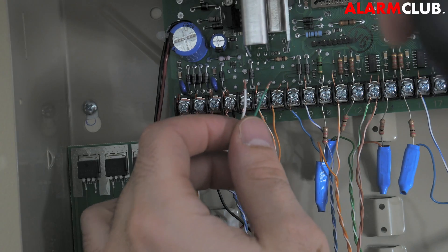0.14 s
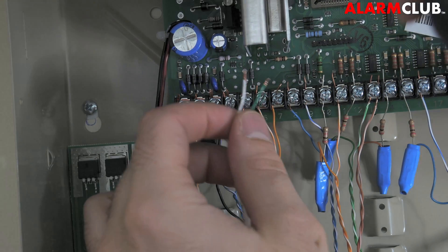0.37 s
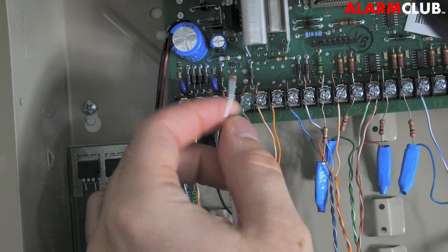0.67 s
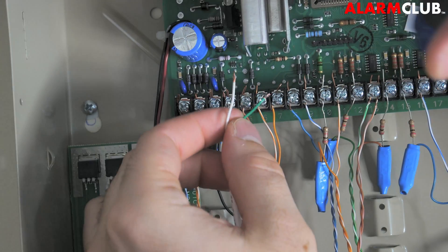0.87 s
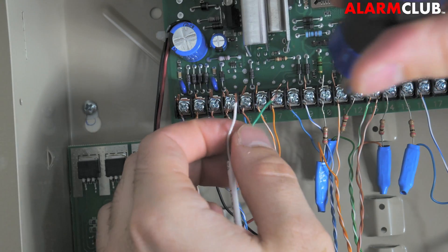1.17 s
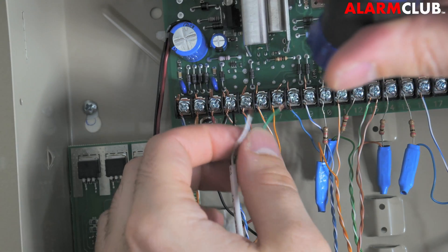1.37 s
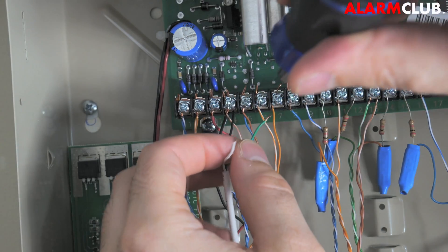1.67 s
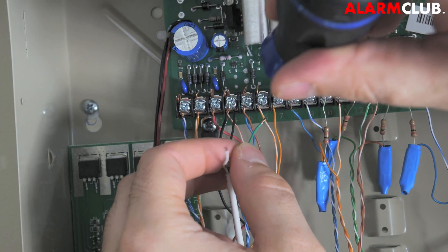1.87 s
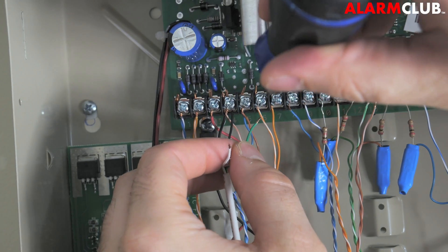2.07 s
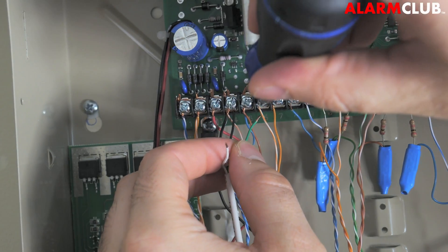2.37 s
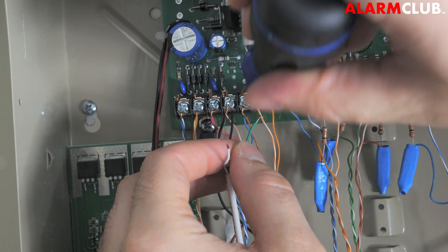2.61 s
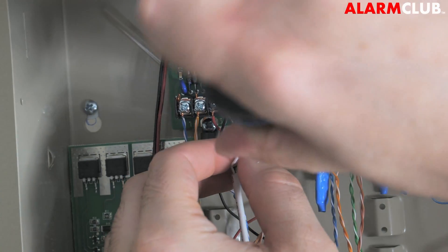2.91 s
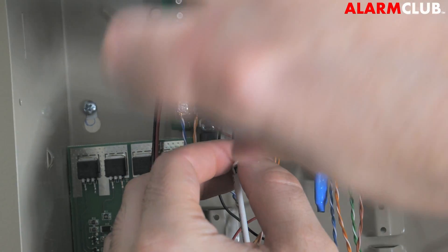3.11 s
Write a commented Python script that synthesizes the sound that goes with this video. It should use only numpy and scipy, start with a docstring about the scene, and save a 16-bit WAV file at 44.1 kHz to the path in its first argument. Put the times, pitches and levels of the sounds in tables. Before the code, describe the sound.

A screwdriver knocks against a terminal block in a sheet-metal cabinet, close and to the left. First, a handled wire ticks faintly from about 0.4 seconds, with a clearer tick at 1.7 and a tiny scrape. Hollow, briefly ringing knocks start at 2.3 and build to one sharp clack at 2.9, followed by a soft bump and faint rub. A fan hums softly throughout in the quiet room.

```python
"""A wire ticks and scrapes faintly in a quiet room, over the soft hum of a fan.
Fingers are bending it at a screw terminal block inside a sheet-metal cabinet.
Then a hand with a screwdriver knocks against the block, building to one sharp clack.
Each tick rings the wire and each knock rings the cabinet: a few clear tones plus fading noise."""
import sys
import numpy as np
from scipy import signal
from scipy.fft import rfft, irfft
from scipy.io import wavfile

SR = 44100
rng = np.random.default_rng(int(sys.argv[2]) if len(sys.argv) > 2 else 0)


def generate_wav(sig):
    """Save sig (samples, or channels by samples) to the path in sys.argv[1] as 16-bit PCM at SR."""
    pcm = np.round(np.clip(np.atleast_2d(sig).T, -1, 1) * 32767).astype(np.int16)
    wavfile.write(sys.argv[1], SR, pcm)


N = 143325
RING_TIME_S = np.arange(SR // 2) / SR  # the clock for one ring

# the tone of the room's air: pitch_hz, relative_db
AIR_TONE = [(12, -21), (20, -0.5), (70, 0), (306, -11), (342, -10), (404, -13), (452, -8.5), (505, -15),
            (788, -14), (958, -19.5), (1230, -18.5), (1450, -22), (15500, -33.5)]
# how alike the air is in both ears: pitch_hz, likeness_0_to_1
AIR_LIKENESS = [(30, 0.15), (100, 0.033), (400, 0.1), (1500, 0.067), (8000, 0.017)]
# the fan's hum: pitch_hz, level_db, width_hz
FAN_TONES = [(472, -78.5, 16), (800.7, -70.5, 25), (1210, -78.5, 54), (1546, -89, 22), (357, -77.5, 30)]
# how long the room echoes: pitch_hz, fade_s (every fade_s is the time to fall by 60 dB)
ROOM_FADES = [(100, .55), (500, 0.19), (2000, 0.28), (10000, 0.17)]
# wire or skin sliding: start_s, length_s, level_db, slips_per_s, brightness_0_to_1
SLIDE_EVENTS = [(1.825, 0.017, -48, 2500, 1), (3.098, .17, -62, 1500, 0.36)]
# the tone of wire scraping a screw: pitch_hz, relative_db
SCRAPE_TONE = [(200, -12), (1000, -5), (2200, 4.5), (4000, 5), (5500, -0.5), (10000, 2), (13500, -3),
               (16000, -30)]
# the tone of skin rubbing: pitch_hz, relative_db
RUB_TONE = [(200, -16), (1800, -7), (2700, 13), (3500, 0), (4600, -20), (7500, -15), (15000, -19)]
# the wire's ticks: start_s, level_db, pitch_hz, boost_at_pitch_db, snap_db
TICK_EVENTS = [(0.383, -28.5, 2480, -1, -5), (0.393, -31, 1370, 11, -15), (0.4514, -27, 3250, 3.5, 4),
               (0.475, -34, 2600, -2, -13), (.497, -36.5, 2240, 1, 0), (.703, -36, 2140, 9, -6),
               (1.002, -25.5, 1500, 15, -2), (1.0686, -24.5, 1690, 0, -7), (1.076, -24, 2300, 2, -10),
               (1.099, -46, 1500, 3, 2), (1.609, -32, 2380, 13, -12), (1.6811, -13.5, 3760, 12, -11.5),
               (1.748, -27.5, 2150, 18, -4), (1.786, -28.5, 3140, 1, 2), (2.551, -39, 2410, 15, 0),
               (2.828, -28, 1650, 10, -23)]
# the clear tones of the wire and its clamp: pitch_hz, relative_db, fade_s
WIRE_TONES = [(1534, -9.5, 0.094), (1860, -21, 0.072), (1984, -7, 0.052), (2540, -9, 0.1),
              (2426, -17, 0.23), (2940, -20, 0.17), (3270, -4.5, 0.028), (3960, -8.5, 0.041)]
# the wire's noisy ring: pitch_hz, relative_db
WIRE_NOISE = [(100, -12), (900, 5), (1500, 9.5), (3800, 0), (4700, -10.5), (6500, -0.5), (8000, -4.5),
              (15000, -9.5)]
# how long that noise lasts: pitch_hz, fade_s
WIRE_FADES = [(500, 0.053), (3000, 0.068), (12000, 0.059)]
# knocks on the block: start_s, level_db, thump_db, hollow_db, bite_db, snap_db
KNOCK_EVENTS = [(2.3336, -1.5, -6.5, 14, 1, -12.5), (2.4026, -0.5, 1, 5, -2, -16),
                (2.4726, -14.5, 9, -2, 5, -11), (2.6185, -4, 7, -2.5, -2, -21),
                (2.7071, -13, 4.5, 5.5, 8.5, -0.5), (2.73, -18, 13.5, -5, 2.5, -6),
                (2.748, -18, 6.5, 3, 5.5, 6.5), (2.8925, 4.5, 2, 5.5, -5.5, -11),
                (2.8977, 5.5, 2.5, -2.5, 3, -5), (2.9, 10, -3.5, -1, 0.5, 5), (2.9062, -3.5, -1, -10, 3, 9),
                (2.9967, -19, 16, 1, 0.5, 5.5)]
# the sheet metal's clear tones: pitch_hz, relative_db, fade_s
CABINET_TONES = [(90, -19.5, 0.18), (119.4, -8.5, 0.15), (160, -21.5, .28), (226.2, -15.5, 0.35),
                 (370.4, -14.5, 0.11), (450.8, -17, 0.17), (492.7, -16, 0.15), (856, -22, 0.078),
                 (1289, -7, 0.092), (1447, -11, 0.06), (1560, -19.5, 0.027), (1750, -17.5, 0.067),
                 (2153, -16.5, 0.05), (2311, -15.5, 0.12), (2762, -15.5, 0.069), (3450, -20.5, 0.11)]
# the noisy ring between those tones: pitch_hz, relative_db
CABINET_NOISE = [(40, -44.5), (100, 6.5), (240, 2), (400, -6), (640, -2), (900, 4.5), (1080, -2),
                 (1300, 1.5), (1750, -2.5), (2700, -2.5), (3500, -8.5), (4200, -15), (5500, -19.5),
                 (6600, -12), (8000, -19.5), (10500, -15), (15500, -24.5)]
# how long that noise lasts: pitch_hz, fade_s
CABINET_FADES = [(100, 0.23), (400, 0.34), (1000, .1), (2500, 0.083), (6000, 0.09), (14000, 0.061)]
# how much louder the left side is at full lean: pitch_hz, left_minus_right_db
LEFT_LOUDER = [(100, 7), (500, 8.5), (1400, 8.5), (3000, 4.5), (6500, 3), (9500, 5), (13000, -3)]
# how far ahead the left wave is at full lean: pitch_hz, lead_radians
LEFT_AHEAD = [(130, 3.2), (500, 2.27), (1300, 2.12), (2400, 0.14), (5000, 1.95), (9000, 2), (14000, 1.5)]

AIR_DB, AIR_LEFT_DB = -56, 0.4
WALL_DELAY_S, WALL_DB, ROOM_DB = 0.019, -12.5, -15  # echoes, compared with the noisy ring
SLIDE_RISE_S, SLIDE_TAIL_S = 0.0048, 0.018
THUMP_HZ, HOLLOW_HZ, BITE_HZ, SNAP_HZ = 1026, 467, 3220, 4640
BUILD_SHARE = 0.0041  # time for a ring to spread through the metal, as a share of fade_s
TONE_SPREAD_DB = 2  # each blow lands in a slightly different place
TREBLE_LIMIT_HZ = 15950


def gain(db):
    """Turns decibels into a multiplier."""
    return 10 ** (np.asarray(db) / 20)


def unit_level(sound):
    """Scales a sound to an average (rms) level of 1."""
    return sound / np.sqrt(np.mean(sound ** 2) + 1e-20)


def look_up(table, hz):
    """Reads between a table's rows, along a musical pitch scale."""
    pitches, values = np.transpose(table)
    return np.interp(np.log(hz + 1), np.log(pitches + 1), values)


def frequencies(sound):
    """The frequency of each slot in a sound's spectrum."""
    return np.fft.rfftfreq(sound.shape[-1], 1 / SR)


def hump(centre_hz, octaves):
    """A bell curve of height 1 around a pitch."""
    return np.exp(-.5 * (np.log2((frequencies(RING_TIME_S) + 1) / centre_hz) / octaves) ** 2)


def add(mix, start_s, sound):
    """Mixes a sound in at its start time."""
    part = mix[:, round(start_s * SR):][:, :sound.shape[1]]
    part += sound[:, :part.shape[1]]


def colour(sound, db):
    """Turns each frequency up or down without smearing the sound ahead of its start."""
    size = sound.shape[-1]
    log_gain = np.log(gain(db))
    mirrored = np.r_[log_gain, log_gain[1:(size + 1) // 2][::-1]]
    response = np.exp(np.conj(signal.hilbert(mirrored)))[:len(db)]
    return irfft(rfft(sound) * response, size)


def blend_sides(noise, likeness):
    """Makes unrelated left and right noise partly alike."""
    left, other = rfft(noise)
    right = likeness * left + np.sqrt(1 - likeness ** 2) * other
    return irfft(np.array([left, right]), noise.shape[-1])


def place_left(sound, lean):
    """Puts a sound to the listener's left, where the cabinet sits."""
    hz = frequencies(sound)
    left = gain(lean * look_up(LEFT_LOUDER, hz) / 2)
    right = np.exp(-1j * lean * look_up(LEFT_AHEAD, hz)) / left
    average = np.sqrt((left ** 2 + left ** -2) / 2)
    return irfft(rfft(sound) * np.array([left, right]) / average, N)


def ring_down(fade_s):
    """A ring builds quickly, then dies away steadily."""
    build = 1 - np.exp(-RING_TIME_S / (BUILD_SHARE * fade_s))
    return build * np.exp(-np.log(1000) * RING_TIME_S / fade_s)


def fading_noise(fades):
    """Crowded reflections blur into noise, each pitch band dying at its own speed."""
    noise = rfft(rng.choice([-1., 1.], (2, len(RING_TIME_S))))
    pitches, fade_times = np.transpose(fades)
    out = 0
    for fade_s, share in zip(fade_times, np.eye(len(fades))):
        band = look_up(np.c_[pitches, share], frequencies(RING_TIME_S))
        fade = ring_down(fade_s)
        out = out + irfft(noise * band) * fade / np.linalg.norm(fade)
    return out


def struck_metal(tones, noise_shape, fades, tones_db, noise_db):
    """One blow: clear tones, plus a noisy ring that echoes off the nearest wall and the room."""
    wall = np.roll(gain(WALL_DB) * fading_noise(fades), round(WALL_DELAY_S * SR), axis=1)
    direct = blend_sides(fading_noise(fades), likeness=0.89)
    room = gain(ROOM_DB) * fading_noise(ROOM_FADES)
    noise = colour(direct + wall + room, look_up(noise_shape, frequencies(RING_TIME_S)))
    clear = 0
    for hz, db, fade_s in tones:
        cycles = hz * rng.uniform(1.0, 1.01) * RING_TIME_S + rng.random()
        tone = np.sin(2 * np.pi * cycles) * ring_down(fade_s)
        clear = clear + gain(db + TONE_SPREAD_DB * rng.standard_normal()) * tone / np.linalg.norm(tone)
    return gain(noise_db) * noise / np.linalg.norm(noise[0]) + gain(tones_db) * clear


def contact_db(thump_db, snap_db):
    """Soft flesh adds low thump to a blow; a hard edge adds high snap."""
    hz = frequencies(RING_TIME_S)
    return thump_db / (1 + (hz / THUMP_HZ) ** 4) + snap_db * (1 - 1 / (1 + (hz / SNAP_HZ) ** 3))


def room_air():
    """The room's air makes a steady low rumble and hiss."""
    hz = frequencies(np.zeros(N))
    noise = blend_sides(rng.standard_normal((2, N)), look_up(AIR_LIKENESS, hz))
    return gain(AIR_DB) * unit_level(colour(noise, look_up(AIR_TONE, hz)))


def fan():
    """A fan hums: each wavering tone is a narrow band of noise."""
    out = np.zeros((2, N))
    for pitch_hz, db, width_hz in FAN_TONES:
        noise = blend_sides(rng.standard_normal((2, N)), likeness=0.49)
        band = 1 / (1 + (2 * (frequencies(out) - pitch_hz) / width_hz) ** 2)
        out += gain(db) * unit_level(irfft(rfft(noise) * band, N))
    return out


def slides():
    """A slide is a crowd of tiny slips: bright for bare wire on a screw, soft for skin."""
    out = np.zeros((2, N))
    hz, size = frequencies(RING_TIME_S), len(RING_TIME_S)
    for start_s, length_s, db, slips_per_s, brightness in SLIDE_EVENTS:
        slips = rng.standard_normal((2, size)) * (rng.random(size) < slips_per_s / SR)
        ringing = irfft(rfft(slips) * rfft(fading_noise(WIRE_FADES)))  # every slip rings the wire
        tone_db = brightness * look_up(SCRAPE_TONE, hz) + (1 - brightness) * look_up(RUB_TONE, hz)
        scrape = colour(blend_sides(ringing, likeness=0.45), tone_db)
        rise = np.minimum(RING_TIME_S / SLIDE_RISE_S, 1)
        fall = np.exp(-np.maximum(RING_TIME_S - length_s, 0) / SLIDE_TAIL_S)
        add(out, start_s, gain(db) * rise * fall * unit_level(scrape))
    return out


def wire_ticks():
    """The wire flicks against the terminals and rings, a little differently each time."""
    out = np.zeros((2, N))
    for start_s, db, pitch_hz, boost_db, snap_db in TICK_EVENTS:
        ring = struck_metal(WIRE_TONES, WIRE_NOISE, WIRE_FADES, tones_db=-1.5, noise_db=4.5)
        tick = colour(ring, boost_db * hump(pitch_hz, octaves=0.35) + contact_db(0, snap_db))
        add(out, start_s, gain(db) * tick / np.linalg.norm(tick[0]))
    return place_left(out, lean=0.8)


def cabinet_knocks():
    """Hand and screwdriver bump the block, and the cabinet's hollow panels ring."""
    out = np.zeros((2, N))
    for start_s, db, thump_db, hollow_db, bite_db, snap_db in KNOCK_EVENTS:
        ring = struck_metal(CABINET_TONES, CABINET_NOISE, CABINET_FADES, tones_db=-3, noise_db=-4.5)
        panel_db = hollow_db * hump(HOLLOW_HZ, octaves=0.18) + bite_db * hump(BITE_HZ, octaves=0.39)
        add(out, start_s, gain(db) * colour(ring, contact_db(thump_db, snap_db) + panel_db))
    return place_left(out, lean=0.87)


def scene():
    """Knocks, ticks and slides over a background that is a touch louder on the left."""
    balance = gain([[AIR_LEFT_DB], [-AIR_LEFT_DB]])
    return cabinet_knocks() + wire_ticks() + slides() + balance * (room_air() + fan())


def record(dry):
    """Cuts away the very highest treble."""
    low_pass = signal.firwin(511, TREBLE_LIMIT_HZ, window=("kaiser", 9), fs=SR)
    return signal.oaconvolve(dry, low_pass[None], "same")


dry = scene()
out = record(dry)
generate_wav(out)
```